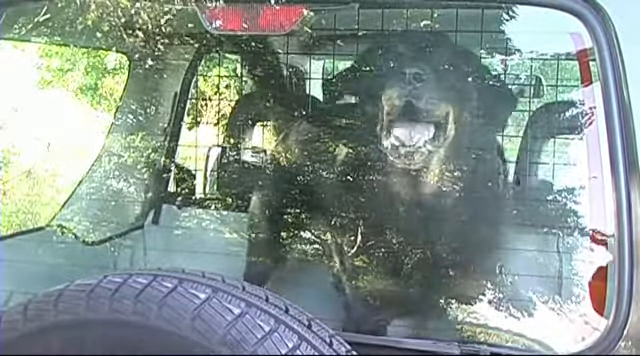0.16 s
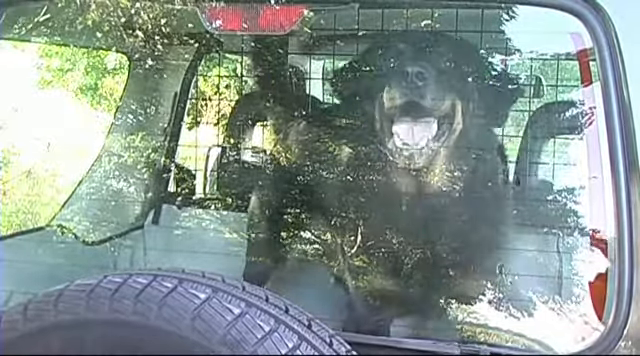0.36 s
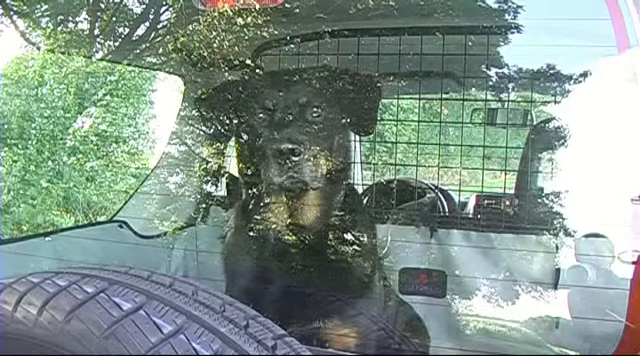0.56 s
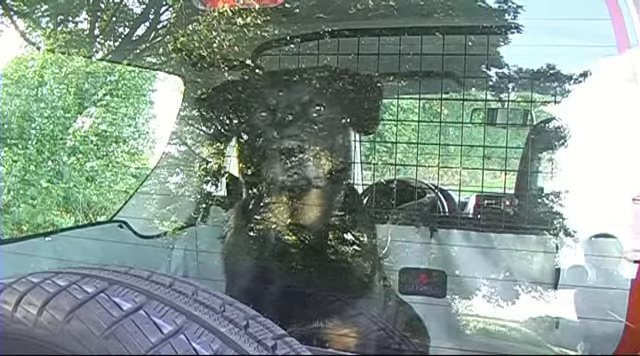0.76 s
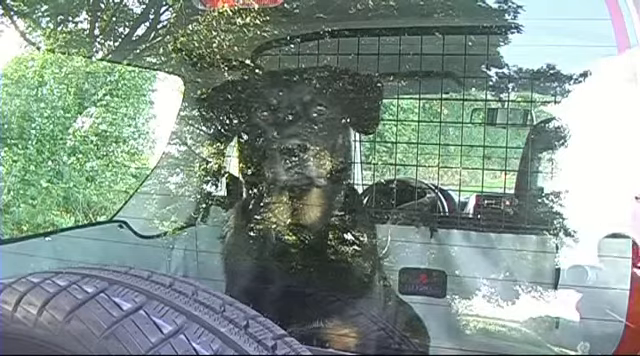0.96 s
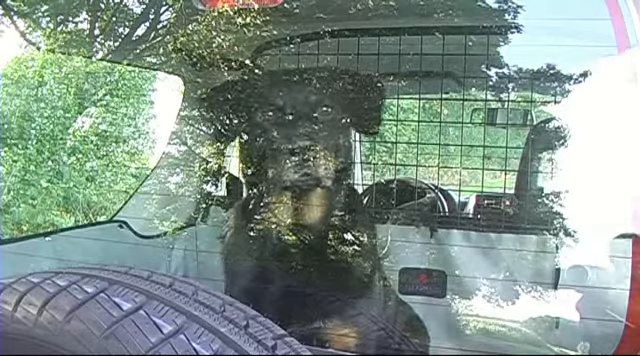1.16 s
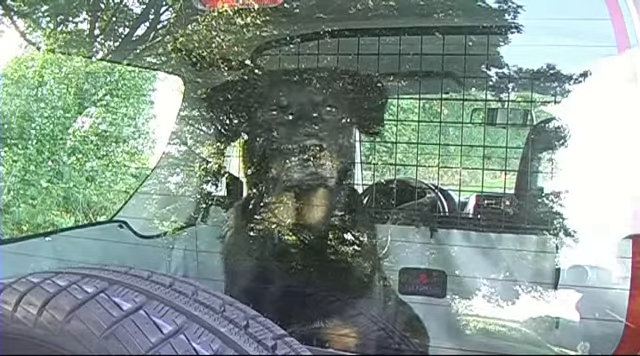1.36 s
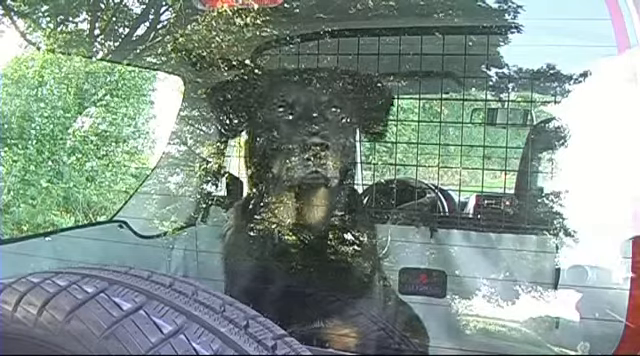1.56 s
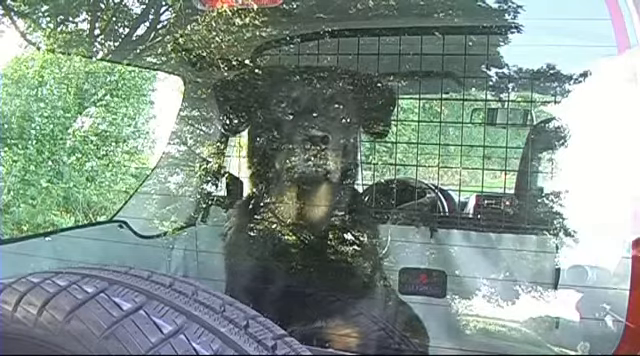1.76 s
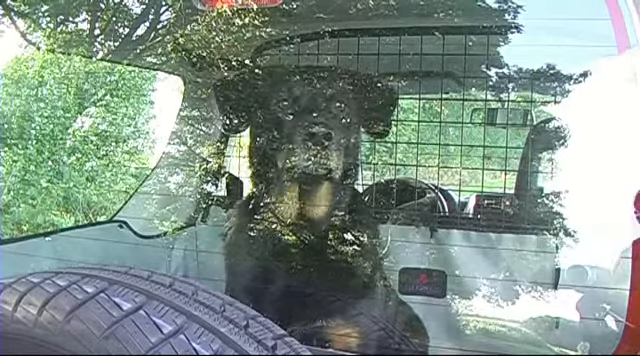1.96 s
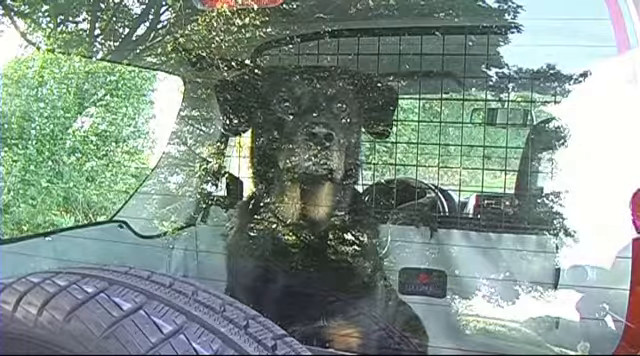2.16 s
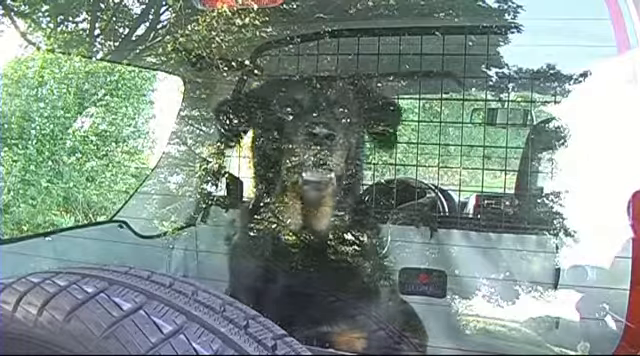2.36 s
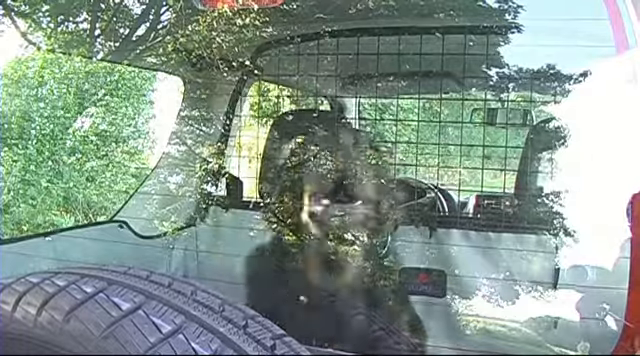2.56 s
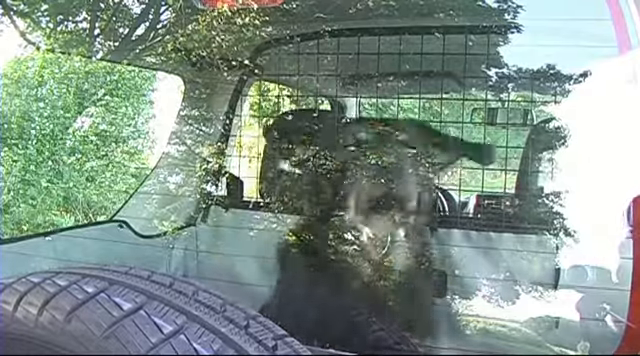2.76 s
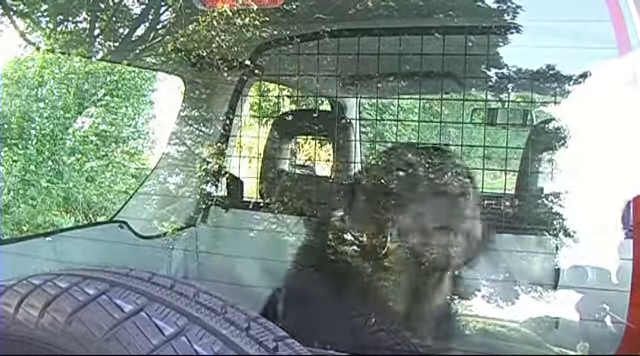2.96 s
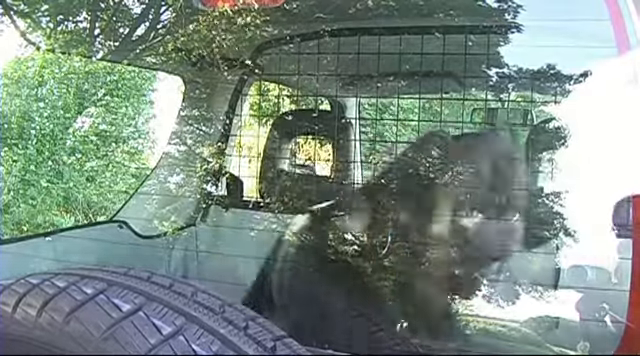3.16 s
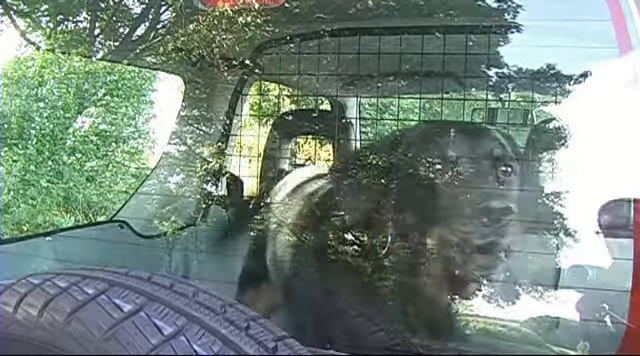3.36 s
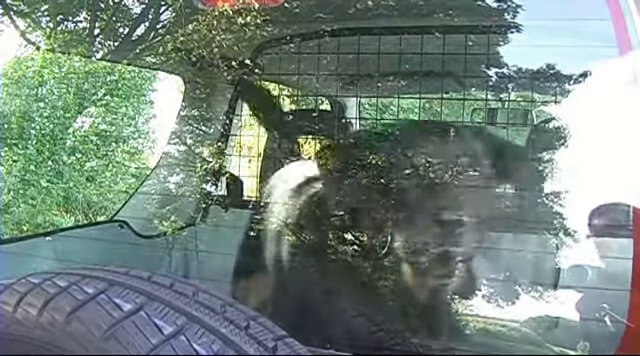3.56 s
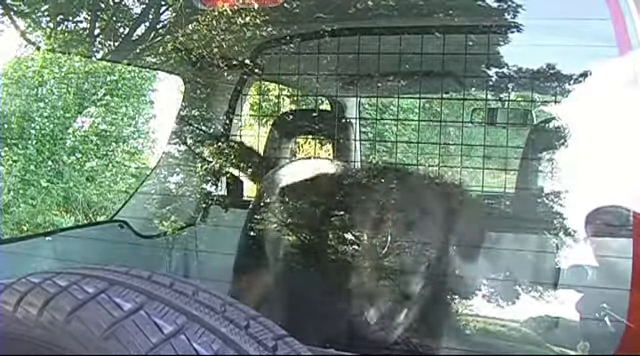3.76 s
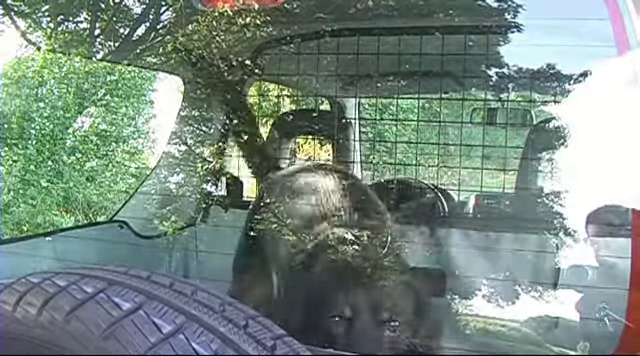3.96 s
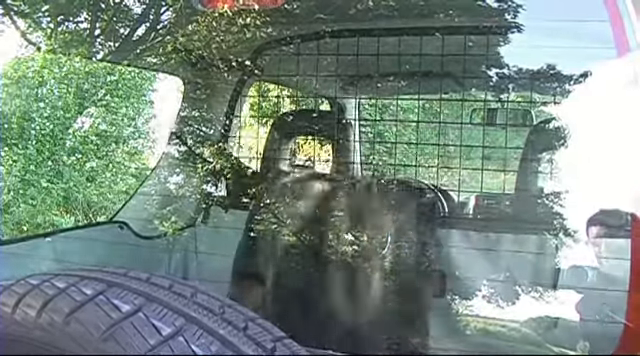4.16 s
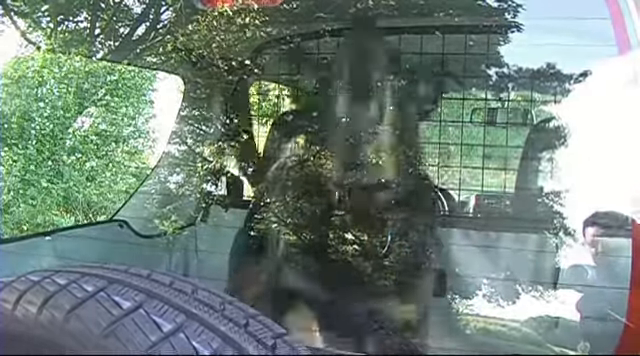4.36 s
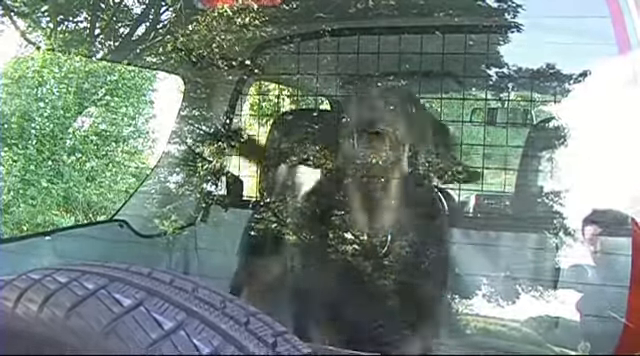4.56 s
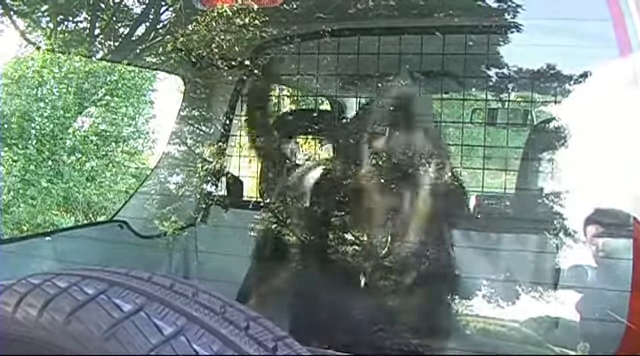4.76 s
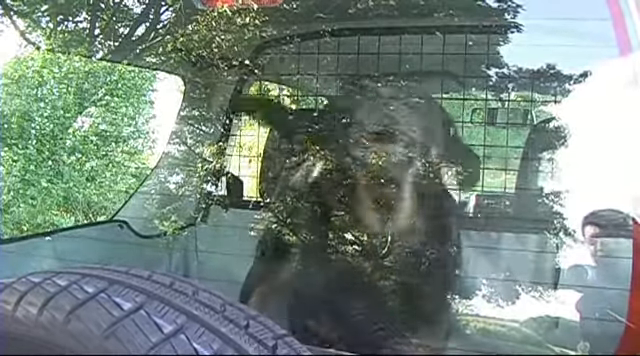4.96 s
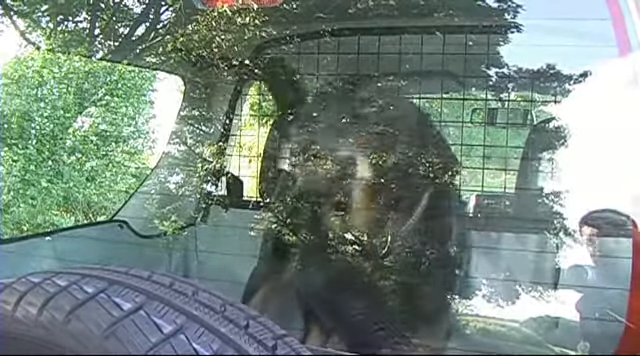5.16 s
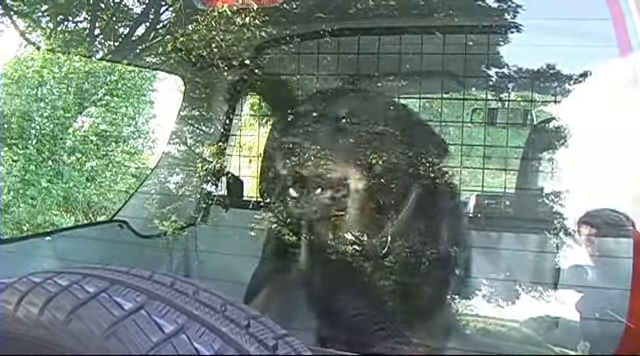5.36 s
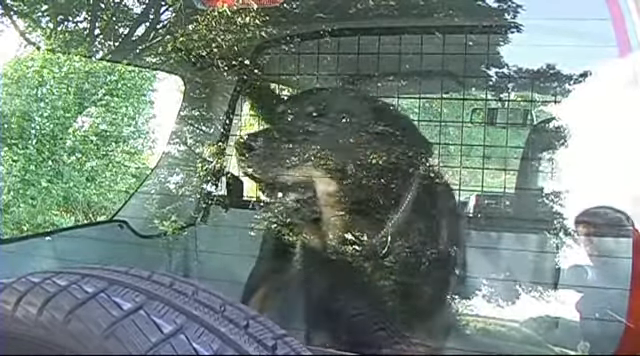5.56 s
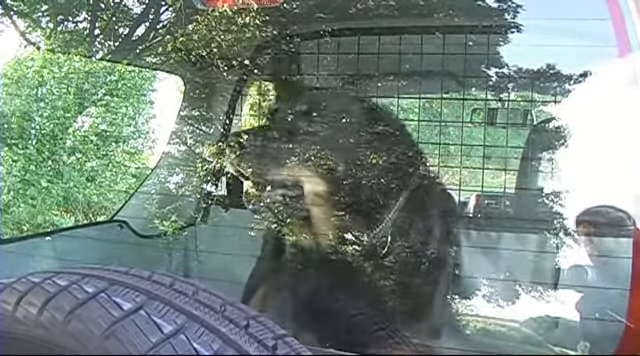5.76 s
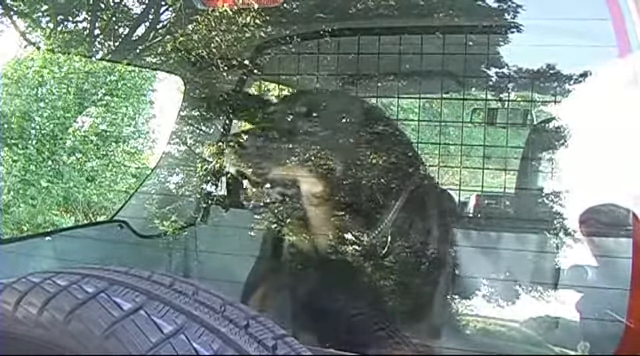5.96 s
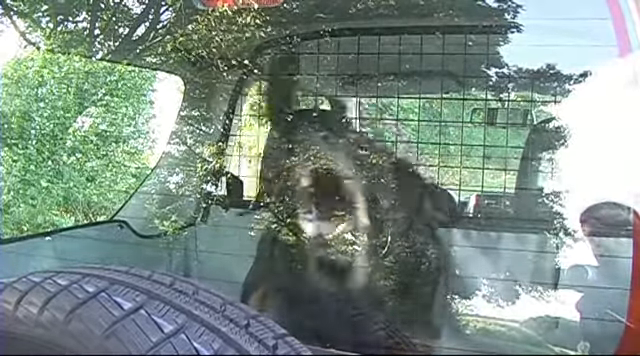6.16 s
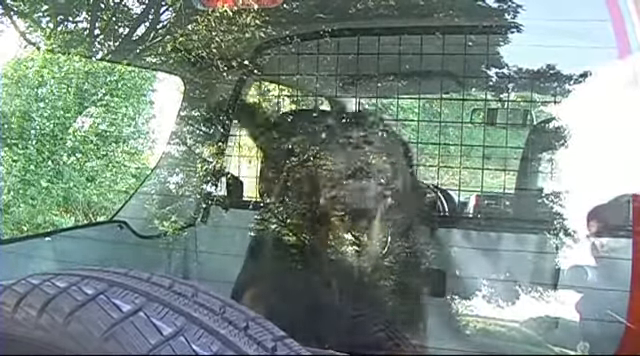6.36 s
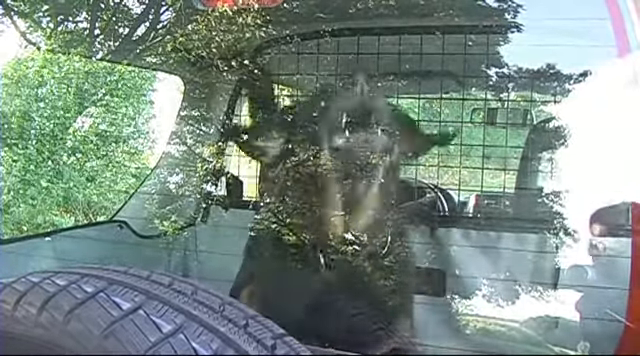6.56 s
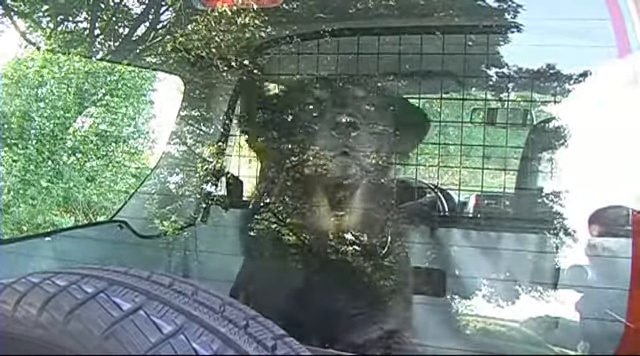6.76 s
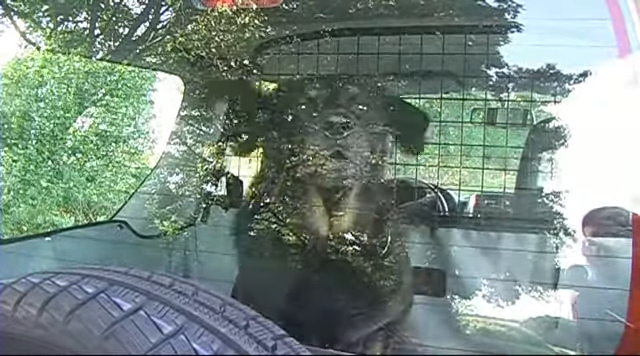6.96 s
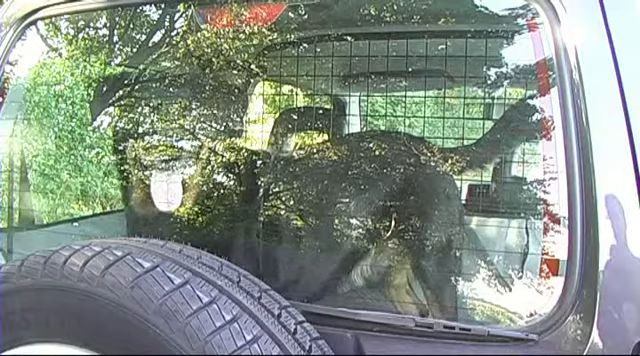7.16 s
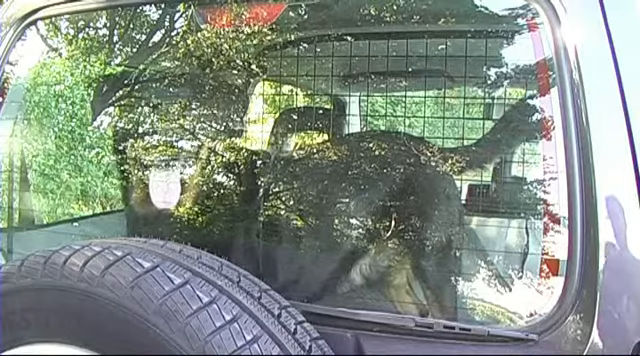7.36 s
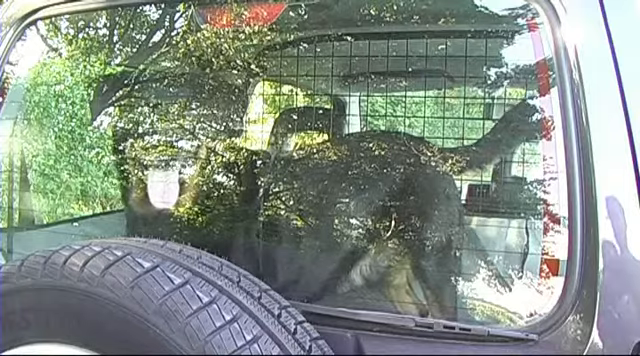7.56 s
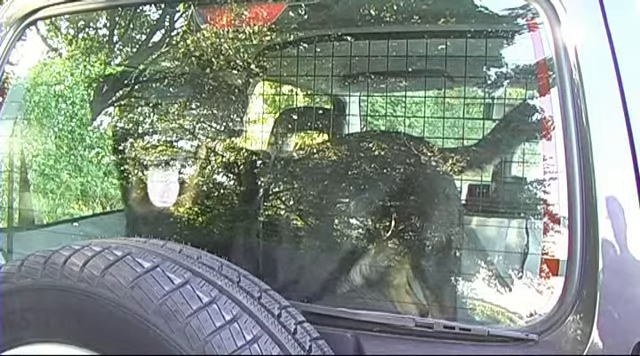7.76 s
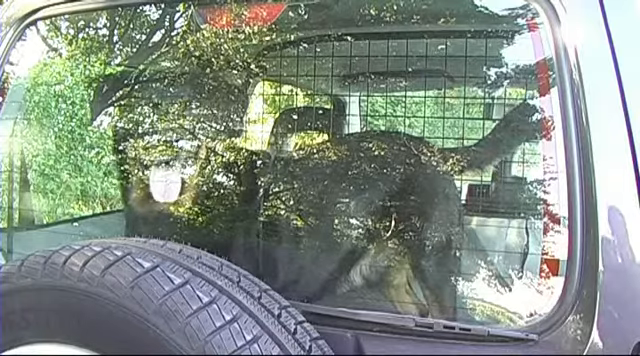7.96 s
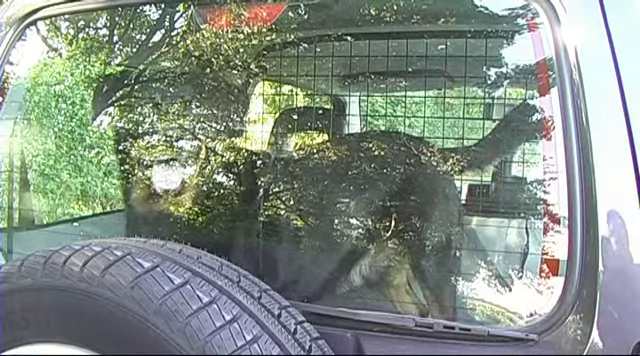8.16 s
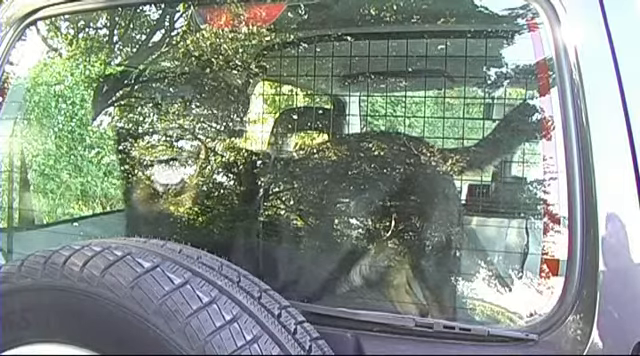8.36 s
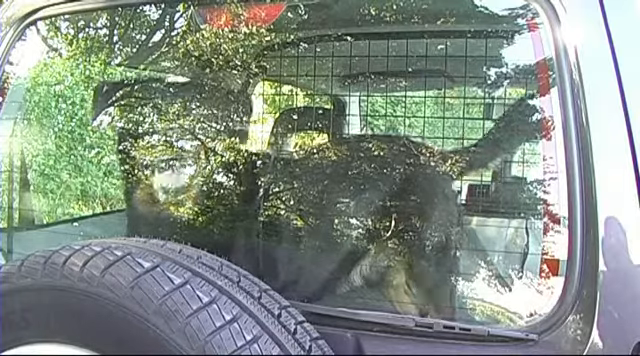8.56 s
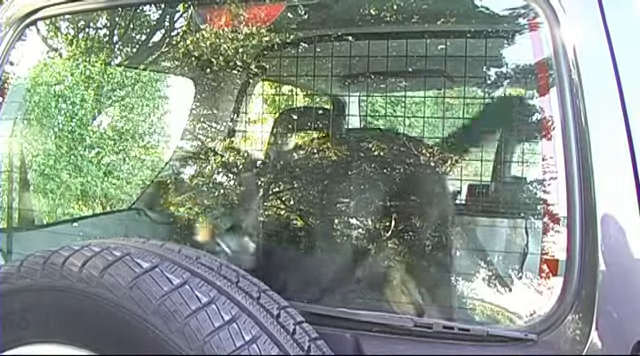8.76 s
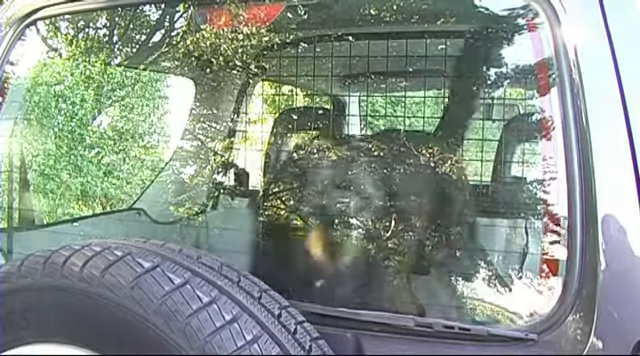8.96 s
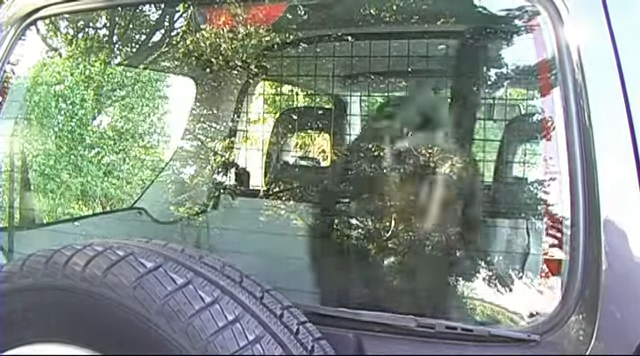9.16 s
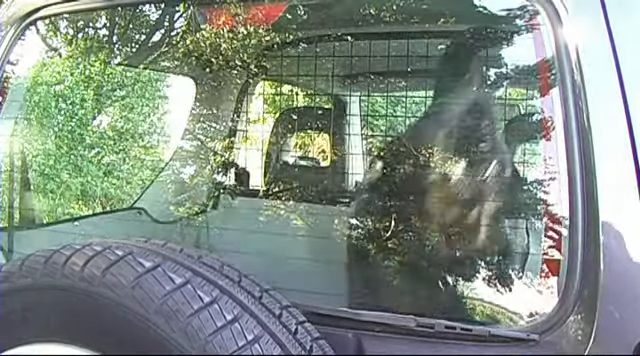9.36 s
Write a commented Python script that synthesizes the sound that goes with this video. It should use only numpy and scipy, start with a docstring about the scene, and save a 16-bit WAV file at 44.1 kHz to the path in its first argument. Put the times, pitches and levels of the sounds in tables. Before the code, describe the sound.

A big dog barks inside a closed car, heard close through the glass. Its bursts run three, three, two and three barks, each a short clear yelp breaking into a rough roar with a brief ringing cabin echo. Thin wavering whines end the first three bursts. Body thumps, cloth-like rustles, claw knocks and tiny squeaks fill the gaps over still outdoor air and faint motor tones.

```python
"""Large dog barking in a closed car

Close by, the microphone just outside the rear window: eleven angry barks in four bursts, on quiet outdoor air.
Pulsing vocal folds and turbulent breath pass the throat and the ringing cabin: each bark is a clear yelp
that breaks into a hoarse roar and dies away; a thin whine closes each of the first three bursts.
Filtered noise makes the body thumps, knocks, claw squeaks and rustles; sines make the camera's faint motor."""
import sys
import numpy as np
from scipy import signal
from scipy.fft import rfft, irfft, next_fast_len
from scipy.io import wavfile
from scipy.ndimage import uniform_filter1d, map_coordinates

SR = 44100
rng = np.random.default_rng(int(sys.argv[2]) if len(sys.argv) > 2 else 0)


def to_wav(s):
    """Save 16-bit WAV."""
    ch = np.atleast_2d(s).T  # columns
    pcm = np.round(np.clip(ch, -1, 1) * 32767)  # PCM
    wavfile.write(sys.argv[1], SR, pcm.astype(np.int16))


N = 414981
TIME = np.arange(N) / SR  # s, one per sample
CLOCK = np.arange(0, N / SR, .001)  # s, the coarser steps on which the voice is controlled

# Spectrum of the still outdoor air: pitch_hz, level_db
AIR_TONE = [(15, -48), (25, -17.5), (59, -3.5), (122, -4.5), (140, -6), (227, -3), (305, -7), (368, -6),
            (598, -5.5), (741, -4.5), (1200, -6.5), (1300, -8), (1850, -9), (5730, -14.5), (15500, -20.5)]
# Slow course of the air's level: start_s, level_db
AIR_LEVEL = [(0, -50.5), (.6, -51.5), (2.2, -52), (5.8, -51), (7.5, -53.5), (9.4, -54.5)]
# Left-right likeness of the air and the knocks: pitch_hz, likeness (1 = identical)
AIR_ALIKE = [(60, 0.77), (150, 0.6), (380, 0.57), (950, 0.25), (2380, 0.25), (5980, 0.042), (15000, 0.03)]
# Hum and whistle of the camera motor, before a common trim: pitch_hz, level_db
MOTOR_TONES = [(118.4, -80), (716.0, -76), (1351, -73), (4867, -84.5), (5701, -64.5), (6298, -91)]
# The dog shifts its weight: centre_s, half_length_s, level_db, pitch_hz
THUMPS = [(.06, 0.061, -53, 218), (.06, 0.097, -53.5, 600), (.78, .14, -55.5, 525),
          (2.39, 0.032, -50.5, 523), (2.54, 0.098, -47, 175), (6.39, 0.062, -47.5, 210),
          (3.6, 0.15, -52, 152), (3.81, 0.033, -46, 488), (3.86, .022, -38.5, 508),
          (3.86, 0.081, -48.5, 189), (4.55, 0.061, -46, 110), (5.08, .12, -50, 192),
          (6.973, 0.046, -45, 338), (7.345, 0.016, -52, 109.4), (8.92, 0.098, -54, 208.1),
          (9.23, .12, -46, 200.4)]
# Soft rustles: centre_s, half_length_s, level_db
RUSTLES = [(1.088, 0.041, -57.5), (1.296, .18, -46), (1.571, .2, -55), (6.29, 0.14, -47),
           (7.063, 0.15, -47.5), (7.971, 0.071, -51)]
# Spectrum of the rustles: pitch_hz, level_db
RUSTLE_TONE = [(180, -42.5), (300, -11.5), (384, -8.5), (590, -6.5), (731, -3.5), (1180, -3.5),
               (1440, -6.5), (5660, -10.5), (15500, -16.5)]

# Throat and mouth as heard through the glass: pitch_hz, level_db
THROAT = [(150, -22.5), (240, -10), (330, -7.5), (400, -2), (480, 4), (630, 3.5), (780, -1.5), (880, 3),
          (1000, -9.5), (1150, -8.5), (1400, -7), (1750, -12), (2150, -21.5), (2500, -29.5), (2800, -33.5),
          (3200, -33), (4400, -41), (6000, -43), (11000, -63), (15000, -82.5)]
# A clear tone passes partly through the nose, hollowed near 900 Hz and again near 1.4 kHz: pitch_hz, level_db
NOSE = [(780, -4), (900, -12.5), (1030, -2.5), (1380, -9.5), (1500, -2.5), (1820, -3.5), (2100, 1),
        (2450, -3), (2800, 0.5), (3400, -2.5), (5000, 0.5)]
# Air hissing past the teeth: pitch_hz, level_db
TEETH_HISS = [(2000, -26.5), (3000, -7.5), (3700, -9.5), (4200, -4.5), (4600, -7.5), (5000, -0.5),
              (5500, -1.5), (6300, -14), (11000, -13.5), (14000, -37)]
# Dying of the reflections in the cabin: pitch_hz, t60_s
CABIN_DECAY = [(200, 0.15), (550, 0.41), (2000, 0.08), (6000, 0.47), (12000, 0.2)]
# Ringing of the cabin's air and glass, before a common trim: pitch_hz, width_hz, level_db
CABIN_MODES = [(491, 11, -9.5), (561, 9, 3.5), (744, 9.7, -3), (792, 31, 10.5), (881, 21, -1.5),
               (913, 20, -6.5), (1360, 28, -10.5), (1693, 6, 5.5), (2040, 7.7, 2.5), (2230, 16, 6),
               (2920, 8.3, 15.5), (3400, 11, 8.5), (4293, 30, 12.5)]
# Edges between the chest, throat and mouth ranges: edge_hz
BAND_EDGES = [610, 1150]

# A clear yelp that breaks into a roar: start_s, attack_s, yelp_length_s, roar_length_s,
# yelp_first_hz, yelp_last_hz, roar_first_hz, roar_last_hz,
# yelp_db, roar_chest_db, roar_throat_db, roar_mouth_db (roar levels are at the break),
# break_roughness (0-1), end_roughness (0-1), tail_fade_db_per_s (on top of the closing jaw), left_right_db
BARKS = [(2.447, 0.023, 0.049, .106, 785, 1045, 579.5, 525, -9.5, -18, -18.5, -25, 0.76, 0.43, 121, -3.5),
         (2.796, .012, .038, 0.13, 671.4, 764, 654.7, 411.9, -14, -21.5, -15.5, -25.5, 0.88, 0.63, 93, -3),
         (3.051, 0.039, 0.078, .066, 419.7, 611.6, 405.1, 384.6, -17.5, -20, -15.5, -28, 0.78, 0.76, 85, -3),
         (4.039, 0.025, .036, .094, 675.7, 705.5, 572, 485, -15.5, -17, -15, -26.5, 0.63, 0.7, 94, -2),
         (4.321, 0.057, .092, .076, 324.4, 558.4, 521.7, 446.7, -15, -14.5, -17.5, -34.5, .75, 0.4, 110.5, -1.5),
         (4.652, 0.076, .096, .068, 325.2, 551, 516.2, 439.1, -14, -15.5, -20, -31.5, .9, 0.24, 80.5, 0),
         (6.097, 0.055, 0.1, .057, 746.3, 684.5, 471, 455, -15, -23, -18, -23, 0.91, 0.6, 196, -1.5),
         (6.247, .006, 0.064, .042, 862.5, 845.5, 429.8, 366.9, -18.5, -21, -29.5, -31.5, 0.61, .45, 142, 0),
         (8.777, .024, .064, 0.13, 422, 560, 451.3, 463.2, -15, -17.5, -17.5, -27.5, .55, .6, 99, 0.5),
         (9.041, 0.043, .052, .119, 331.9, 507.5, 419.9, 432.3, -16, -17.5, -16, -29.5, 0.66, 0.42, 80, -0.03),
         (9.32, 0.044, 0.054, 0.2, 321.7, 480, 696.4, 753.7, -18.5, -19, -15, -32, 0.54, 0.56, 95, -0.5)]
# Swell over the attack, for chest, throat and mouth; the mouth rises from furthest down: rise_db
ATTACK_DB = [24.5, 18.5, 26]
# Dimming by the closing jaw, for chest, throat and mouth: rate_db_per_s
CLOSING_DB_PER_S = [12, 43.5, 36]
# A clear tone is loudest where its low harmonics fall: pitch_hz, chest_db, throat_db, mouth_db
YELP_BALANCE = [(320, -5.5, -0.5, -18), (399, 0.5, -2, -14.5), (476.9, 1.5, -11, -11),
                (617, 1.5, -14.5, -12), (650, -33, 1.5, -14), (850, -24.5, 0, -13), (1040, -23, -1, -14.5)]
# A yelp rattles until the folds are taut: pitch_hz, added_roughness (0-1)
SLACK_ROUGH = [(320, .22), (450, 0.21), (540, 0)]
# The highest yelps weaken all overtones but the first: pitch_hz, level_db
FALSETTO = [(770, 0), (880, -11.5)]
# One list per whine, closing each of the first three bursts: time_s, pitch_hz, fundamental_db, overtones_db
WHINES = [
    [(3.35, 301.9, -42, -44), (3.426, 373.5, -39, -35.5), (3.468, 410.2, -25, -49),
     (3.484, 397.7, -26, -61), (3.512, 379.4, -43.5, -36), (3.554, 398.6, -41, -45.5),
     (3.59, 417.3, -23.5, -53), (3.668, 479.7, -35.5, -49.5), (3.692, 529.5, -26.5, -59),
     (3.71, 528.9, -39, -77)],
    [(4.93, 275.1, -34, -44.5), (4.96, 283.1, -36.5, -48.5), (4.99, 303.1, -28.5, -58.5),
     (5.008, 328.5, -42.5, -42), (5.052, 360.9, -32, -39.5), (5.11, 382.2, -25.5, -40),
     (5.152, 364.3, -34, -45), (5.168, 364.3, -29.5, -40), (5.27, 367.3, -32, -42),
     (5.3, 325.2, -42, -42.5)],
    [(6.43, 335.5, -40, -38.5), (6.48, 395.4, -35, -34.5), (6.524, 432.2, -29, -53),
     (6.598, 430.3, -34, -41.5), (6.646, 398.9, -29, -60), (6.684, 373.5, -37.5, -46),
     (6.73, 354.6, -40.5, -58.5), (6.8, 330.6, -47.5, -40), (6.858, 332.8, -54.5, -36),
     (6.925, 345.4, -34.5, -55.5)],
]
# Rattle of a whine: pitch_hz, roughness (0-1)
WHINE_ROUGH = [(290, 0), (320, 0.01), (380, 0)]
# Each bark's lunge rocks the car: delay_s, half_length_s, level_db, pitch_hz
LUNGE = [(.14, .13, -57, 170), (0.164, .16, -61.5, 65.7)]

# Knocks of claws, jaws and the dog guard: start_s, peak_db, treble_db (relative, before a common trim)
KNOCKS = [(6.94, -20, -28), (6.952, -27, -24), (7.199, -39, -13), (7.568, -42, -19), (7.917, -41, -22),
          (8.29, -46, 2), (8.723, -37, -23), (8.737, -36, -26)]
# Spectrum of a knock's dull body: pitch_hz, level_db
KNOCK_TONE = [(150, -54), (250, -14), (356, -2), (914, 3), (1140, -5.5), (1570, -23.5), (1980, -14.5),
              (2270, -19), (3340, -14.5), (5930, -32), (14000, -35.5)]
# Claws squeak on the trim: centre_s, half_length_s, level_db, pitch_hz
SQUEAKS = [(9.085, 0.042, -58, 4220), (9.372, 0.029, -46, 4243)]

GLIDE_SHARE, GLIDE_LAG = .85, 2.8  # part of the yelp its glide takes; a higher power holds the first pitch longer
YELP_ROUGH, STRAIN_ROUGH = 0.017, 0.19  # base roughness 0-1 of a yelp, and its rise just before the break
STRAIN_S = 0.016  # time constant of that rise
RELEASE_DB, RELEASE_S = 7, 0.0047  # the push ends in a quick drop before the tail
REST_HZ, TAIL_ROUGH = 297.1, .42  # pitch and roughness 0-1 toward which a spent bark settles
SETTLE_S = .1  # time constant of that settling
NOISE_SHARE = .6  # breath's share of the voice's power at full roughness
WHINE_MOUTH_DB = -13  # mouth range against the mean of the two lower ranges
WHINE_FADE_DB_PER_S = 340.5  # rise and fall outside a whine's ends
DRUM_HZ, TOP_HZ = 299.7, 15750  # camera's motor speed and band limit


def amp(db):
    """Decibels to gain."""
    return np.exp(np.asarray(db) * (np.log(10) / 20))


def unit(x):
    """Scaled to rms 1."""
    return x / np.sqrt(np.mean(x ** 2) + 1e-20)


def steady(x, size=1100):
    """Scaled to rms 1 from moment to moment; size in samples."""
    power = uniform_filter1d(uniform_filter1d(x ** 2, size), size)
    return x / np.sqrt(np.abs(power) + 1e-12)


def along(points, hz):
    """Values at hz from (Hz, value) points on a log axis."""
    f, v = np.transpose(points)
    return np.interp(np.log(hz + 1), np.log(f + 1), v)


def curves(rows):
    """One value per sample for each column after the time."""
    s, *cols = np.transpose(rows)
    return [np.interp(TIME, s, c) for c in cols]


def wobble(rate):
    """A smooth random curve, rate knots a second."""
    coarse = TIME[::8]
    knots = rng.standard_normal(int(N * rate / SR) + 4)
    return np.interp(TIME, coarse, map_coordinates(knots, [coarse * rate]))


def swell(s, length, t):
    """A bell-shaped rise and fall around time s, down by 17 dB at length s to either side."""
    return np.exp(-2 * np.minimum(np.abs(t - s) / length, 10) ** 2)


def coloured(x, gain):
    """x through the causal minimum-phase filter that has this gain over frequency."""
    m = 2 * next_fast_len(N // 2 + 8192)
    log_gain = np.log(np.maximum(gain(np.fft.rfftfreq(m, 1 / SR)), 1e-6))
    cepstrum = irfft(log_gain, m)
    # folding the cepstrum forward in time makes the filter causal
    cepstrum[1:m // 2] *= 2
    cepstrum[m // 2 + 1:] = 0
    return irfft(rfft(x, m) * np.exp(rfft(cepstrum)), m)[..., :N]


def rush(spectrum, alike):
    """Stereo noise of rms 1 with a spectrum and a left-right likeness."""
    m = next_fast_len(N)
    hz = np.fft.rfftfreq(m, 1 / SR)
    turn = np.arccos(np.clip(along(alike, hz), -1, 1)) / 2
    noise = rfft(rng.standard_normal((2, m))) * amp(along(spectrum, hz))
    mid, side = irfft(noise * [np.cos(turn), np.sin(turn)], m)[:, :N]
    return unit(np.array([mid + side, mid - side]))


def echoes(x, decay, channels):
    """Dense reflections; each frequency dies at its own speed."""
    hz, t, z = signal.stft(rng.standard_normal((channels, SR // 2)), SR, nperseg=256)
    fading = amp(-60 * t / along(decay, hz)[:, None])
    tail = signal.istft(z * fading, SR, nperseg=256)[1]
    return signal.fftconvolve(np.atleast_2d(x), tail / np.linalg.norm(tail[0]), axes=1)[:, :N]


def outdoor_air(drift_db=-0.5):
    """Still air: wide, slowly drifting noise."""
    level = curves(AIR_LEVEL)[0] + drift_db * wobble(2.9)
    return amp(level) * rush(AIR_TONE, AIR_ALIKE)


def motor(trim_db=-1, waver_rad=.5):
    """The camera's own faint hum and whistle: steady sines whose phases waver together."""
    drift = waver_rad * wobble(3.1)
    return sum(amp(db + trim_db) * np.sqrt(2) * np.sin(2 * np.pi * hz * TIME + drift)
               for hz, db in MOTOR_TONES)


def rubs(table, width, order=2):
    """Each push of the moving dog excites one resonance of the floor or trim: a short swell of band noise."""
    out = np.zeros(N)
    for s, length, db, hz in table:
        near = np.flatnonzero(np.abs(TIME - s) < 2 * length)
        band = [hz / (1 + width), hz * (1 + width)]
        panel = signal.butter(order, band, "band", fs=SR, output="sos")
        noise = unit(signal.sosfilt(panel, rng.standard_normal(SR)))
        out[near] += amp(db) * swell(s, length, TIME[near]) * noise[-len(near):]
    return out


def thumps():
    """The dog's shifting weight sounds low resonances of the car's body."""
    return rubs(THUMPS, width=0.28)


def rustles(crinkle_db=2.0):
    """Soft strokes of noise with a crinkling level."""
    strokes = sum(amp(db) * swell(s, length, TIME) for s, length, db in RUSTLES)
    return strokes * amp(crinkle_db * wobble(70)) * rush(RUSTLE_TONE, [(500, 1.0), (5000, 0.43)])


def bark(start, attack, yelp, roar, first_hz, last_hz, roar_hz, end_hz, yelp_db, chest_db, throat_db,
         mouth_db, rough, end_rough, fade, pan_db):
    """Pitch, roughness, balance and range levels of one bark: gliding yelp, sudden break, sliding roar, tail."""
    age = CLOCK - start
    broken = np.maximum(age - yelp, 0)  # s since the break
    spent = np.maximum(broken - roar, 0)  # s since the roar's end
    # the yelp swells, glides and strains
    progress = np.clip(age / (GLIDE_SHARE * yelp), 0, 1)
    glide = first_hz + (last_hz - first_hz) * np.sin(np.pi / 2 * progress) ** GLIDE_LAG
    tension = STRAIN_ROUGH * np.exp(np.minimum(age - yelp, 0) / STRAIN_S)
    strain = YELP_ROUGH + along(SLACK_ROUGH, glide) + tension
    attack_left = np.clip(1 - age / attack, 0, 1)
    hz, *balance = np.transpose(YELP_BALANCE)
    yelp_levels = [yelp_db - rise * attack_left + np.interp(glide, hz, db)
                   for db, rise in zip(balance, ATTACK_DB)]

    # the roar slides from its first to its last value; once it is spent the folds settle
    def settling(first, last, rest):
        return rest + (np.interp(broken, [0, roar], [first, last]) - rest) * np.exp(-spent / SETTLE_S)

    release = RELEASE_DB * np.minimum(spent / RELEASE_S, 1) + fade * spent
    roar_levels = [db - closing * broken - release
                   for db, closing in zip([chest_db, throat_db, mouth_db], CLOSING_DB_PER_S)]
    pitch = np.where(age < yelp, glide, settling(roar_hz, end_hz, REST_HZ))
    roughness = np.where(age < yelp, strain, settling(rough, end_rough, TAIL_ROUGH))
    levels = np.where(age < 0, -200, np.where(age < yelp, yelp_levels, roar_levels))
    return [pitch, roughness, np.full(len(CLOCK), pan_db), *levels]


def whine(rows, pan_db=-1.6):
    """The same controls for a thin, nearly clean whine, its fundamental in the chest range."""
    s, *cols = np.transpose(rows)
    pitch, low, overtones = (np.interp(CLOCK, s, c) for c in cols)
    fade = WHINE_FADE_DB_PER_S * np.abs(CLOCK - np.clip(CLOCK, s[0], s[-1]))
    mouth = (low + overtones) / 2 + WHINE_MOUTH_DB
    pan = np.full(len(CLOCK), pan_db)
    return [pitch, along(WHINE_ROUGH, pitch), pan, low - fade, overtones - fade, mouth - fade]


def voicing():
    """One throat makes all the cries: at each moment the strongest one takes it over."""
    cries = np.array([bark(*row) for row in BARKS] + [whine(rows) for rows in WHINES])
    strongest = cries[:, 3:].max(axis=1).argmax(axis=0)
    controls = cries[strongest, :, np.arange(len(CLOCK))]
    return curves(np.column_stack([CLOCK, controls]))


def larynx(pitch, rough, jitter=0.05443, tremor=0.0058, shimmer_db=5, flap_db=3, tilt_db=-2, flutter_db=3,
           doubling=0.3, edge_hz=460, corner=4.45, count=11):
    """Regular fold pulses turn into uneven growling pulses and breath as roughness rises."""
    rough = np.clip(rough, .001, 1)
    unsteady = 1 + (tremor + jitter * rough) * wobble(200)
    phase = 2 * np.pi * np.cumsum(pitch * unsteady) / SR
    # the overtones flutter quickly and irregularly in level
    flutter = flutter_db * wobble(25)
    falsetto = along(FALSETTO, pitch)
    pulses = np.cos(phase)
    for k in range(2, count + 1):
        # the folds close softly, so that only the first few overtones are strong
        closure = 1 / np.sqrt(1 + (k / corner) ** 8)
        # each overtone takes the flutter from another half second
        level = tilt_db * np.log2(k) + (k > 2) * falsetto + np.roll(flutter, k * SR // 2)
        pulses = pulses + amp(level) * closure * np.cos(k * phase)
    # alternate strong and weak cycles add a growl an octave below
    growl = 1 + doubling * np.sqrt(rough) * np.cos(phase / 2 + wobble(90))
    pulses = pulses * growl * amp(shimmer_db * rough ** 0.62 * wobble(340))
    # air bursts through once a cycle, in puffs of uneven size
    puffs = rng.standard_normal(N) * (1 + np.cos(phase)) * amp(flap_db * wobble(380))
    puffs = signal.sosfilt(signal.butter(4, edge_hz, "high", fs=SR, output="sos"), puffs)
    clear = coloured(pulses, lambda hz: amp(along(THROAT, hz) + along(NOSE, hz)))
    hoarse = coloured(puffs, lambda hz: amp(along(THROAT, hz)))
    share = np.clip(NOISE_SHARE * rough ** 1.5, 0, 1)
    return np.sqrt(1 - share) * steady(clear) + np.sqrt(share) * steady(hoarse)


def cabin(x, ring_db=-1, echo_db=-11):
    """The closed car adds its ringing modes and a short wash of reflections."""
    m = next_fast_len(N + SR // 2)
    f = np.fft.rfftfreq(m, 1 / SR)
    ring = sum(amp(db) * 1j * f * width / (hz * hz - f * f + 1j * f * width)
               for hz, width, db in CABIN_MODES)
    ringing = irfft(rfft(x, m) * ring, m)[:N]
    return x + amp(ring_db) * ringing + amp(echo_db) * echoes(x, CABIN_DECAY, channels=1)[0]


def registers(x):
    """The chest, throat and mouth ranges of the voice, each held at rms 1."""
    m = next_fast_len(N + 4096)
    hz = np.fft.rfftfreq(m, 1 / SR)
    below_first, below_second = (1 / (1 + (hz / edge) ** 36) for edge in BAND_EDGES)
    bands = np.array([below_first, below_second - below_first, 1 - below_second])
    return steady(irfft(rfft(x, m) * bands, m)[:, :N], size=800)


def dog(rasp_db=-38, rasp_growth=0.43, spit_db=3.0, unrest_db=1.5):
    """The jaw shifts the voice between chest, throat and mouth; hoarse pushes surge and hiss past the teeth."""
    pitch, rough, pan_db, *levels = voicing()
    rough, pan_db = uniform_filter1d(np.array([rough, pan_db]), size=330, axis=1)
    surges = unrest_db * rough * np.array([wobble(55) for _ in levels])
    gains = np.abs(uniform_filter1d(amp(levels + surges), size=200, axis=1))
    cry = np.sum(gains * registers(cabin(larynx(pitch, rough))), axis=0)
    panned = cry * amp(np.array([pan_db, -pan_db]) / 2)
    # the hiss grows with the mouth's level and the roughness
    hiss = amp(rasp_db + spit_db * wobble(80)) * gains[-1] ** rasp_growth * np.sqrt(np.abs(rough))
    return panned + hiss * rush(TEETH_HISS, [(3000, .6), (9000, 0.47)])


def lunges():
    """The dog throws itself into every bark, and the car's body answers with low resonances."""
    pushes = [(start + delay, length, db, hz)
              for start, *_ in BARKS for delay, length, db, hz in LUNGE]
    return rubs(pushes, width=0.59)


def knocks(t60=0.045, snap_db=1, snap_t60=0.022):
    """Short dull knocks, each a decaying noise with a thin, faster snap on top; t60 in s."""
    body, snap = np.zeros(N), np.zeros(N)
    for s, db, treble_db in KNOCKS:
        age = np.maximum(TIME - s, 0)
        body += (age > 0) * amp(db - 60 * age / t60)
        snap += (age > 0) * amp(db + treble_db - 60 * age / snap_t60)
    snap_tone = [(1000, -25), (3500, -10), (13000, -9)]  # Hz, dB
    return body * rush(KNOCK_TONE, AIR_ALIKE) + amp(snap_db) * snap * rush(snap_tone, AIR_ALIKE)


def squeaks():
    """Claws on the trim excite narrow high resonances."""
    return rubs(SQUEAKS, width=0.058)


def scene(yard_db=-21, scatter_db=10):
    """The cries and knocks scatter off the car and the trees, least in the bass; the other sounds stay dry."""
    car = dog() + knocks()
    scatter_tone = [(500, 0.5), (1500, 19.0), (5000, scatter_db)]  # Hz, dB
    scattered = coloured(echoes(car, CABIN_DECAY, channels=2), lambda hz: amp(along(scatter_tone, hz)))
    body = thumps() + lunges() + squeaks()
    return car + amp(yard_db) * scattered + body + outdoor_air() + rustles() + motor()


def record(dry, depth=0.79, notch_hz=14, top_db=-4):
    """The camera notches multiples of its motor speed, softens the top octave and cuts above its band limit."""
    def microphone(hz):
        off = (hz + DRUM_HZ / 2) % DRUM_HZ - DRUM_HZ / 2  # distance to the nearest multiple
        notches = 1 - np.clip(depth, 0, .95) / (1 + (off / notch_hz) ** 2)
        return notches * amp(along([(11000, 0), (15500, top_db)], hz))

    m = next_fast_len(N + 4096)
    kept = np.fft.rfftfreq(m, 1 / SR) < TOP_HZ
    return irfft(rfft(coloured(dry, microphone), m) * kept, m)[:, :N]


dry = scene()
out = record(dry)
to_wav(out)
```